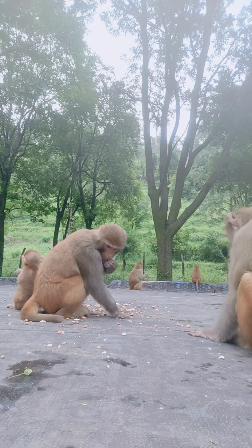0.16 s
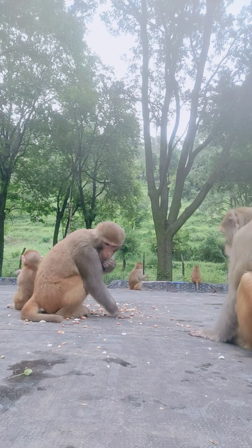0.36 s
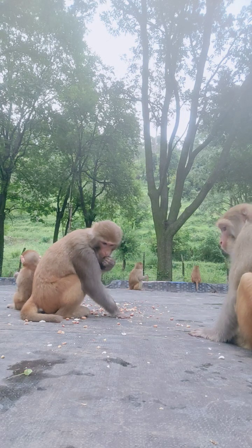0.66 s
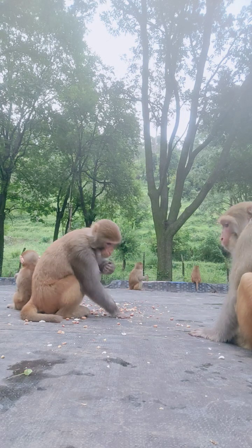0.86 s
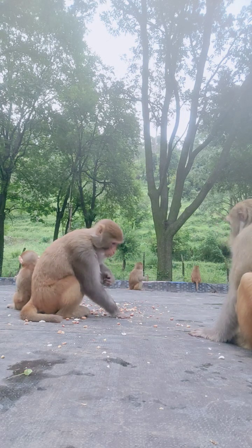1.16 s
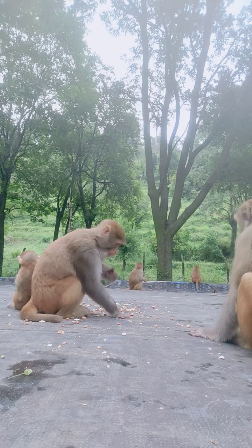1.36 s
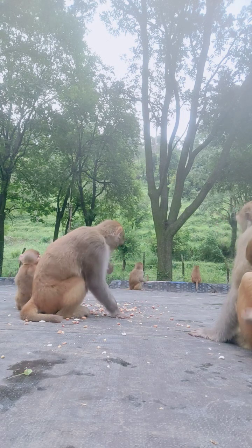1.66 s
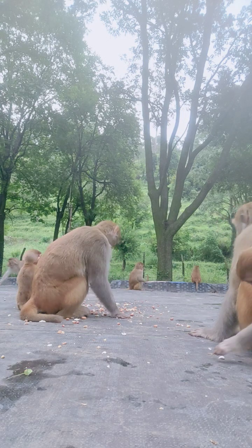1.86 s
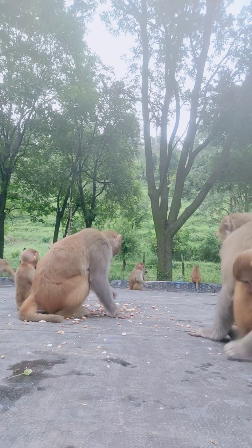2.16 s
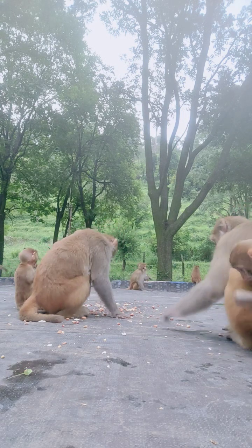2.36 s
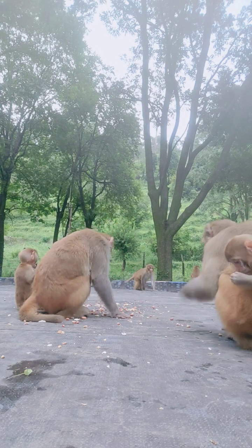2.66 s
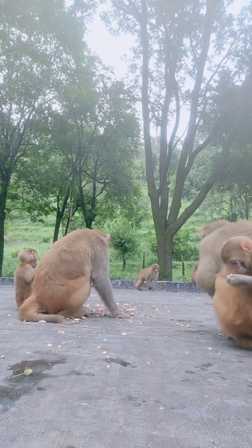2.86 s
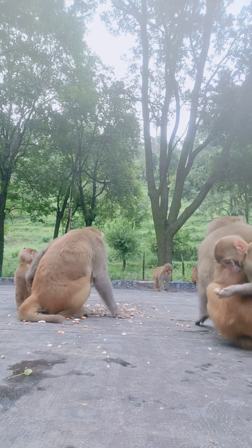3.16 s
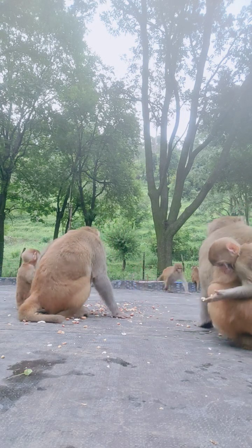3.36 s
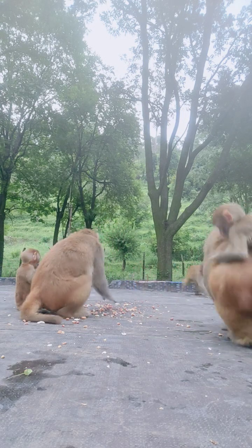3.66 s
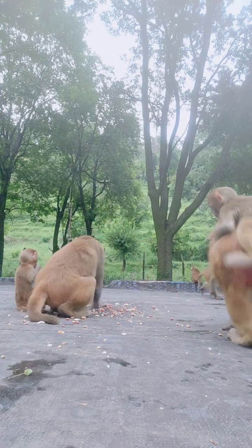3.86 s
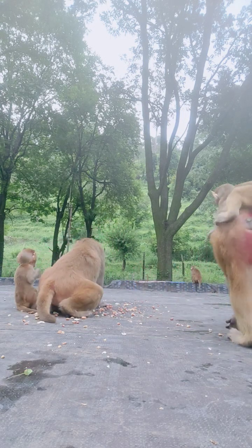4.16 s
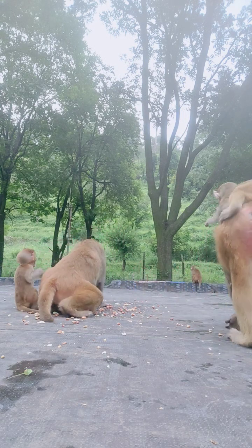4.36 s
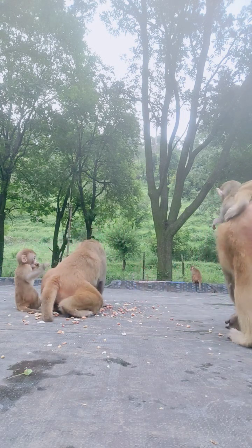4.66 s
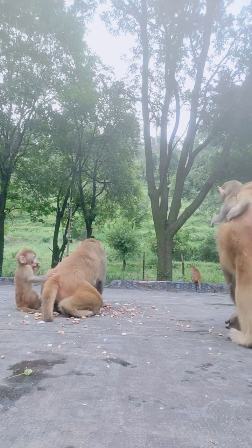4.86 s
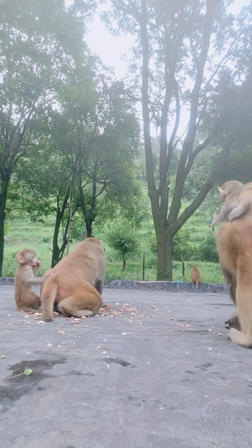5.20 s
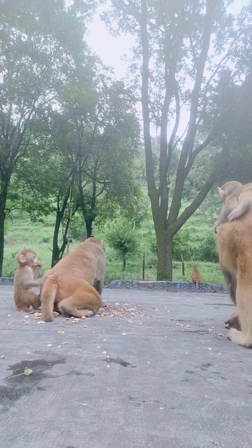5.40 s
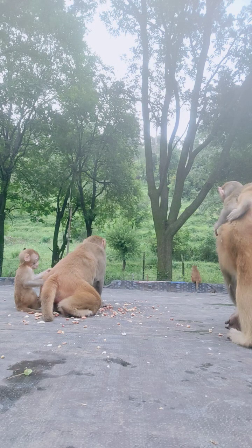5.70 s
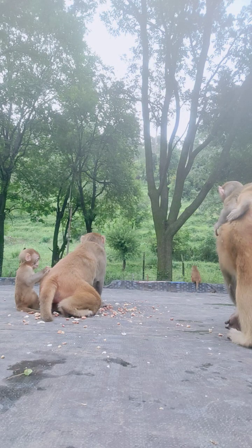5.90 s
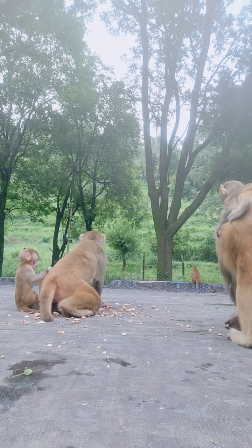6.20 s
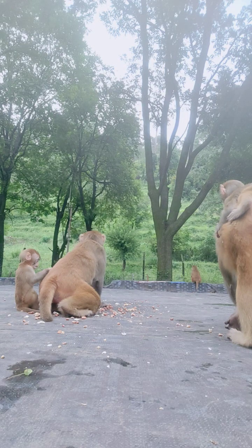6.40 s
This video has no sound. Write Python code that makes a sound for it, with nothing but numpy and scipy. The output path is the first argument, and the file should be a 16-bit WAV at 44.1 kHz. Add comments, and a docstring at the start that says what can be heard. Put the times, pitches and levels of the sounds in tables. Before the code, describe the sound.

A monkey troop forages in an open grove. A nearby caller repeats breathy, fluttering barks in runs, then pauses, ending with a stronger bark that is cut off. Faint husk snaps, dry rustle, a distant thin bird whistle, small coos, pulsed infant squeaks and chopped grunts fill the gaps. Continuous high cicada whine and soft low air surround it; the stereo microphone hears lively outdoor echoes.

```python
"""A paved yard among trees: one macaque gives four bouts of hoarse barks that the grove throws back.
Each bark mixes a fluttering fold tone with breath noise ringing the throat. Others coo in clean overtones,
grunt in chopped breath and squeak in pulsed trills and hiss. A far bird whistles in thin narrow noise.
Husks snap and rustle as tiny noise bursts, cicadas whine as ringing clicks, the air hums as shaped noise."""
import sys
import numpy as np
from scipy import signal
from scipy.fft import rfft, irfft
from scipy.io import wavfile
from scipy.ndimage import uniform_filter1d

SR = 44100
rng = np.random.default_rng(int(sys.argv[2]) if len(sys.argv) > 2 else 0)


def store_wav(level_fs):
    """Save 16-bit WAV to argv[1]."""
    pcm = np.round(np.clip(np.atleast_2d(level_fs), -1, 1) * 32767)
    wavfile.write(sys.argv[1], SR, pcm.T.astype(np.int16))


N = 288414  # length [samples]


def amp(db):
    """Decibels to an amplitude factor."""
    return 10 ** (np.asarray(db) / 20)


def evened(x):
    """Scales a sound to rms 1."""
    return x / np.sqrt(np.mean(abs(x) ** 2) + 1e-20)


def read(points, hz):
    """Reads a (frequency, value) table at hz, straight lines on a log frequency axis."""
    f, value = np.transpose(points)
    return np.interp(np.log(hz + 1), np.log(f + 1), value)


def curves(rows):
    """Turns rows of (time, values...) into one smooth-running curve per value."""
    s, *columns = np.transpose(rows)
    t = np.arange(s[0], s[-1], 1 / SR)
    return [np.interp(t, s, c) for c in columns]


def add(mix, s, sound):
    """Lays a sound into the mix at s seconds, cut at the end of the mix."""
    part = mix[round(s * SR):][:len(sound)]
    part += sound[:len(part)]


def resonate(x, hz, width, order=2):
    """A resonance that can move: shifts the curve hz to zero, smooths, shifts back."""
    turn = np.exp(2j * np.pi * np.cumsum(hz * np.ones(len(x))) / SR)
    r = np.exp(-np.pi * width / SR)
    low = x / turn
    for _ in range(order):
        low = signal.lfilter([1 - r], [1, -r], low)
    return 2 * (turn * low).real


def wobble(n, hz):
    """Slow chance of rms about 1, moving up to about hz."""
    span = max(int(SR / hz / 2), 1)
    once = uniform_filter1d(rng.standard_normal(n + 4000), span)
    return evened(uniform_filter1d(once, span))[2000:n + 2000]


def coloured(x, points):
    """Weights the spectrum of x by a (frequency, level) table."""
    return irfft(rfft(x) * amp(read(points, np.fft.rfftfreq(len(x), 1 / SR))), len(x))


# The caller's barks: (time [s], length [s], effort [dB], top pitch [Hz], mouth resonance [Hz],
# mouth opening [dB], rasp resonance [Hz], rasp [dB]); wobbles and bends play around these
BARKS = [(0.368, 0.18, -24.5, 569, 871, -1.5, 1385, -17), (0.566, 0.22, -24.5, 566, 886.4, -4, 1430, -17.5),
         (0.787, 0.22, -25.5, 532.2, 886, -4.5, 1440, -16.5),
         (1.016, 0.22, -26, 548.4, 918.7, 1.5, 1530, -20.5), (1.227, 0.2, -26, 564.4, 889, 1, 1530, -19),
         (1.45, 0.2, -26.5, 570, 899.7, 1, 1578, -16.5), (2.192, 0.19, -24.5, 556, 943.5, -3, 1510, -18),
         (2.398, 0.2, -24, 563.4, 922.4, -4.5, 1513, -17),
         (2.608, 0.23, -24, 553, 905.4, -6.5, 1527, -16.5),
         (2.817, 0.22, -25, 539.6, 917, -5.5, 1540, -16.5),
         (3.027, 0.2, -23, 545.4, 907, -4.5, 1550, -16.5), (3.224, 0.21, -27.5, 537, 939, -1, 1597, -16),
         (4.044, 0.1953, -25.5, 575.7, 998, -3, 1730, -14),
         (4.307, 0.2, -25.5, 562.2, 973, -4.5, 1730, -13.5),
         (4.531, 0.2, -26, 555.8, 931, -2.5, 1627, -15.5), (4.758, 0.21, -26.5, 553, 970, -2, 1670, -16.5),
         (5.021, 0.19, -27, 582.7, 1027, 0, 1790, -15.5), (6.224, 0.16, -27, 586, 1004, 3, 1670, -18.5),
         (6.493, 0.22, -21.5, 623, 1030, -9.5, 1730, -13)]
# Top of the throat, for a rasp at 1500 Hz: (frequency [Hz], width [Hz], level relative to the rasp [dB])
THROAT_TOP = [(2183, 250, -15), (2602, 100, -18.5)]
# First bark of each bout: (time [s])
BOUT_STARTS = [0.37, 2.195, 4.043, 6.225]
EDGE_PITCH, SAG_HZ = .475, 49.6  # end pitch as a share of mouth resonance; total sag along the bark
SCOOP_HZ, SCOOP_S = 31.5, 0.013  # the voice slides up into the bark
SWELL_DB, TIRING_DB_PER_S = 4.5, -4.5  # early barks of a bout swell, later ones fade
HALF_DB = -28.5  # faint line at half pitch, relative to effort


def bark(s, length, effort_db, top_hz, mouth_hz, mouth_db, rasp_hz, rasp_db):
    """Unsteady folds arch in pitch and flutter; breath noise rings the throat most while the mouth is widest."""
    n = int(length * SR)
    u = np.linspace(0, 1, n)  # progress through the bark
    opening = np.sin(np.pi * u ** .78)
    edge_hz = EDGE_PITCH * mouth_hz
    pitch = edge_hz - SAG_HZ * (u - .5) + (top_hz - edge_hz) * opening
    pitch = pitch - SCOOP_HZ * np.exp(-u * length / SCOOP_S)
    breath = rng.standard_normal(n + 2000)

    # voiced tone of the folds
    jitter = 1 + .03 * wobble(n, 60) + .03 * wobble(n, 15)
    phase = 2 * np.pi * np.cumsum(pitch * jitter) / SR
    unsteady = np.minimum(u / .3, 1)  # the folds start firm
    beating = np.sin(2 * np.pi * np.cumsum(35 + 9 * wobble(n, 20)) / SR)
    flutter = 1.4 - .4 * unsteady + unsteady * (.3 * wobble(n, 60) + .33 * beating)
    low = flutter * np.sin(phase) + .42 * opening * evened(resonate(breath[:n], pitch, 200))

    # breath through mouth and throat, gated by strong-weak fold beats
    puffs = breath[:n] * (1 + .5 * np.cos(phase / 2))
    bend = 0.935 + 0.084 * opening + 0.035 * wobble(n, 18)  # the jaw wavers
    high = evened(resonate(puffs, mouth_hz * bend, 80))
    high = high + amp(-4.5) * evened(resonate(breath[500:n + 500], 0.803 * mouth_hz, 350))
    rasp = evened(resonate(breath[2000:], rasp_hz * bend, 90))
    rasp = rasp + amp(-1.5) * evened(resonate(puffs, .91 * rasp_hz * bend, 200))
    for hz, width, db in THROAT_TOP:
        ring = evened(resonate(puffs, hz * (rasp_hz / 1500) ** 0.48, width))
        rasp = rasp + amp(db + 2.2 * wobble(n, 23)) * ring
    high = (high + amp(rasp_db) * rasp) * (1 + 0.2 * (flutter - 1))  # the flutter chops the breath too

    since_start = min(abs(s - b) for b in BOUT_STARTS if b < s + .05)
    fade_db = SWELL_DB + TIRING_DB_PER_S * since_start
    shape = np.minimum(1, np.minimum(u / 0.063, (1 - u) / 0.18)) * amp(fade_db * (u - .5))
    voice = evened(low) + amp(mouth_db) * high * (0.15 + opening ** 2)
    thin = signal.butter(4, 320, "high", fs=SR, output="sos")
    half = amp(HALF_DB) * flutter * np.sin(phase / 2) * shape
    return amp(effort_db) * (half + signal.sosfilt(thin, voice * shape))


# Clean coos, one table each: (time [s], pitch [Hz], level [dB])
COOS = [
    [(1.25, 838, -50), (1.28, 863, -52), (1.37, 872, -55), (1.41, 844, -58)],
    [(1.76, 561, -43), (1.83, 620, -48), (1.89, 678, -46.5), (1.98, 660, -50.5), (2.05, 578, -40)],
    [(2.06, 620, -46.5), (2.1, 587, -49), (2.15, 604, -50)],
    [(2.27, 649, -55), (2.31, 664, -40.5), (2.36, 590, -45), (2.43, 573, -48), (2.49, 523, -57)],
]
# Mouth colour of each coo: (frequency [Hz], level [dB])
COO_MOUTHS = [
    [(870, -2), (1740, -17), (2600, 4), (3500, -10.5), (4350, -9), (5200, -13), (6100, -28), (7800, -13),
     (8700, -39)],
    [(650, -29), (1300, -6), (1950, -33.5), (2280, -19), (2700, -22.5), (3200, -50)],
    [(600, -0.5), (1200, -36.5), (9000, -75)],
    [(600, -15), (1200, -3), (1900, -7), (2500, -26), (5200, -12.5), (7000, -25), (9000, -26), (11000, -35),
     (14000, -32)],
]
# Time until the lips are open and the high overtones sound, per coo: (time [s])
COO_OPENING = [0.014, .02, .02, 0.1]


def coo(rows, mouth, opening):
    """Steady folds: clean overtones weighted by the mouth; the high ones come as the lips open."""
    hz, db = curves(rows)
    n = len(hz)
    shut_db = -25 * np.clip(1 - np.arange(n) / SR / opening, 0, 1) ** .5
    phase = 2 * np.pi * np.cumsum(hz * (1 + 0.0031 * wobble(n, 40))) / SR
    tone = np.zeros(n)
    for k in range(1, 26):
        lips_db = shut_db * np.minimum(k * hz / 4000, 1) ** 2
        tone += amp(read(mouth, k * hz) + lips_db) * np.sin(k * phase)
    return amp(db) * np.sqrt(2) * tone * signal.windows.tukey(n, .2)


# Rough grunts close by, one table each: (time [s], level [dB])
GRUNTS = [
    [(5.6, -46), (5.645, -42)],
    [(5.638, -34), (5.72, -37.5), (5.79, -65)],
    [(6.45, -36.5), (6.497, -45)],
    [(6.49, -35), (6.54, -31.5)],
]
# Mouth colour of the grunts: (frequency [Hz], level [dB per Hz])
GRUNT_MOUTH = [(90, -30), (200, -0.5), (540, 2), (1200, -7), (2100, -13.5), (3050, -7), (3500, -15.5),
               (4200, -9.5), (4800, -29.5), (12000, -44)]


def grunt(rows):
    """Breath chopped by uneven fold beats, around 325 a second."""
    db, = curves(rows)
    n = len(db)
    beats = np.cumsum(325 + 60 * wobble(n, 80)) / SR
    gate = .05 + np.exp(-(beats % 1) / .15)
    puffs = gate * amp(3.5 * wobble(n, 90)) * rng.standard_normal(n)
    return amp(db) * evened(coloured(puffs, GRUNT_MOUTH)) * signal.windows.tukey(n, 500 / n)


# Infant squeaks, levels before placing left:
# (time [s], trill level [dB], trill pitch [Hz], trill length [s], breath hiss level [dB])
SQUEAKS = [(3.251, -47, 3170, 0.015, -65.5), (3.464, -39.5, 3490, 0.05, -52),
           (3.684, -41.5, 3510, 0.022, -57), (3.88, -45.5, 3540, 0.027, -57),
           (5.009, -51, 3070, 0.039, -61.5), (5.222, -40, 3020, 0.019, -53),
           (5.436, -44, 3340, 0.021, -55.5), (5.951, -50, 3580, 0.024, -54)]
# Hiss colour, slid along so that its third row lands on the trill: (frequency [Hz], level [dB per Hz])
HISS = [(1500, -12.5), (3300, -3.5), (3620, 3.5), (3950, -1), (8300, -16), (9800, -13), (12500, -11.5),
        (15500, -14.5)]


def squeak(trill_db, trill_hz, length, hiss_db):
    """A falling trill of short pulses and a crackly puff of hiss that rings at the same pitch and dies away."""
    t = np.arange(SR // 4) / SR
    n = len(t)
    colour = [(f * trill_hz / HISS[2][0], db) for f, db in HISS]
    hiss = evened(coloured(rng.standard_normal(n), colour))
    hiss = hiss * amp(2.5 * wobble(n, 25) + 2 * wobble(n, 500))  # grainy, in clumps
    ring = evened(resonate(rng.standard_normal(n), trill_hz * (1 + 0.012 * wobble(n, 11)), 380))
    ring = ring * amp(3.5 * wobble(n, 60)) * np.clip(t / .03 - .5, 0, 1) * np.exp(-(t / .2) ** 4)
    hiss = hiss * np.minimum(t / 0.007, 1) * np.exp(-(t / 0.13) ** 2) + amp(-8.5) * ring

    u = np.clip((t - .018) / length, 0, 1)  # progress through the trill
    beats = np.cumsum(270 * (1 + 0.13 * wobble(n, 110))) / SR
    gate = np.cos(np.pi * beats) ** 4
    shape = np.sin(np.pi * u) ** 3.9
    glide = trill_hz * (1.04 - 0.14 * u) * (1 + 0.057 * wobble(n, 300))
    trill = np.sin(2 * np.pi * np.cumsum(glide) / SR) * gate * shape

    # a quick upward flick opens the squeak
    phase = 2 * np.pi * np.cumsum(trill_hz * (0.85 + 22 * t)) / SR
    flick = (np.sin(phase) + 0.53 * np.sin(3 * phase)) * np.sin(np.pi * np.minimum(t / 0.006, 1))
    return amp(trill_db) * 2 * trill + amp(hiss_db) * (hiss + amp(-8.5) * flick)


# Echo decay of the grove by band: (frequency [Hz], time to fall 60 dB [s])
GROVE = [(300, 0.95), (800, 0.91), (2000, 0.78), (4000, 0.75), (12000, 0.042)]
# Left-right likeness of echoes and air: (frequency [Hz], likeness [0 to 1])
SAME = [(60, 0.95), (400, 0.99), (800, 0.97), (1250, 0.17), (3000, 0.053)]


def grove(x):
    """Sparse echoes from trunks and paving, each band dying at its own speed; treble scatters more, both sides."""
    taps = np.zeros((3, SR))  # one shared set, then one for each ear
    at = np.arange(300, SR - 20, 20) + rng.integers(0, 20, (3, (SR - 301) // 20))
    np.put_along_axis(taps, at, rng.choice([-1., 1.], at.shape), 1)
    hz, t, z = signal.stft(taps, SR, nperseg=256)
    same = np.clip(read(SAME, hz), 0, 1)[:, None]
    z = same * z[0] + np.sqrt(1 - same ** 2) * z[1:]
    decay_db = -60 * t / read(GROVE, hz)[:, None]
    tail = signal.istft(z * amp(decay_db + 7.4 * (1 - same)), SR, nperseg=256)[1]
    tail = tail / np.linalg.norm(tail[0])
    return signal.fftconvolve(x[None], tail, axes=1)[:, :len(x)]


# Far bird, levels before placing left: (start [s], end [s], start pitch [Hz], level [dB])
WHISTLES = [(1.035, 1.225, 3610, -69), (1.699, 2.143, 4340, -75), (2.604, 2.903, 4360, -71.5),
            (2.836, 2.987, 3540, -64.5), (4.63, 4.796, 3585, -66), (4.864, 5.33, 4360, -69.5),
            (5.718, 5.95, 4360, -73), (6.345, 6.45, 3580, -63)]


def whistle(length, hz, db):
    """A thin tone of narrow noise that glides up a little, blurred by distance."""
    n = int(length * SR)
    glide = hz * (1 + 0.034 * np.sin(1.9 * np.linspace(0, 1, n)))
    tone = evened(resonate(rng.standard_normal(n), glide, 55))
    return amp(db) * tone * signal.windows.tukey(n, .5)


# Dry husks snapping, levels before placing left: (time [s], level [dB])
TICKS = [(1.4007, -45), (1.785, -52), (2.343, -53), (2.824, -48)]


def tick(db):
    """A snap of bright noise that dies within about a millisecond."""
    t = np.arange(130) / SR
    return amp(db) * np.diff(rng.standard_normal(131)) * np.exp(-t / .0006)


CICADA_DB = -55  # level before the throb


def cicadas():
    """Many tymbals clicking out of step ring two broad neighbouring resonances, differently at each ear."""
    clicks = rng.standard_normal((2, N)) * (rng.random((2, N)) < .3)
    choir = [resonate(c, 6516, 770) + amp(-5.5) * resonate(c[::-1], 7190, 580) for c in clicks]
    throb = amp([.8 * wobble(N, 40) for _ in clicks])
    return amp(CICADA_DB) * evened(np.array(choir)) * throb


RUSTLE_DB, RUSTLE_PER_S = -69.5, 200  # level; crackle rate before clumping


def rustle():
    """Tiny dry crackles of husks and fur, in clumps, different at each ear."""
    chance = RUSTLE_PER_S * amp(5 * wobble(N, 3.2)) / SR
    sizes = amp(5.3 * np.minimum(rng.exponential(1, (2, N)), 5))
    sizes = sizes * (rng.random((2, N)) < chance)
    snap = rng.standard_normal(120) * np.exp(-np.arange(120) / 30)
    crackle = [resonate(signal.oaconvolve(side, snap)[:N], 19000, 5000) for side in sizes]
    return amp(RUSTLE_DB) * evened(np.array(crackle))


# Colour of the humming air: (frequency [Hz], level [dB per Hz])
AIR = [(25, -64.5), (65, -18), (110, -7), (250, -4), (600, -7), (1100, -13.5), (2400, -20.5), (4500, -24),
       (5300, -18), (8600, -36.5), (13000, -28.5), (15500, -33)]
AIR_DB = -53.5


def air():
    """Random short-time spectra with drifting patches; bass alike in both ears."""
    frames, hz = N // 256 + 5, np.fft.rfftfreq(1024, 1 / SR)
    a, b, c, d, patches = rng.standard_normal((frames, 513, 5)).T
    patches = evened(uniform_filter1d(uniform_filter1d(patches, 12, 0), 14, 1))
    same = np.clip(read(SAME, hz), -1, 1)[:, None]
    left = a + 1j * b
    right = same * left + np.sqrt(1 - same ** 2) * (c + 1j * d)
    z = np.array([left, right]) * amp(read(AIR, hz)[:, None] + 1.5 * patches)
    return amp(AIR_DB) * evened(signal.istft(z, nperseg=1024, noverlap=768)[1][:, :N])


def scene():
    """Places every voice, sends it into the grove and lays the background under it."""
    lead = SR // 4  # a bark that has just ended still rings in the grove
    caller = np.zeros(N + lead)
    troop, near, cooing = np.zeros((3, N))
    add(caller, .08, bark(*BARKS[5]))
    for s, *row in BARKS:
        add(caller, s + lead / SR, bark(s, *row))
    for rows, mouth, opening in zip(COOS, COO_MOUTHS, COO_OPENING):
        add(cooing, rows[0][0], coo(rows, mouth, opening))
    for rows in GRUNTS:
        add(near, rows[0][0], grunt(rows))
    for s, *row in SQUEAKS:
        add(troop, s, squeak(*row))
    for s, end, *row in WHISTLES:
        add(troop, s, whistle(end - s, *row))
    for s, db in TICKS:
        add(troop, s, tick(db))
    direct = np.array([caller[lead:], caller[lead - 3:-3]])  # the right port is a little farther
    barks = amp(-1.5) * direct + amp(-8) * grove(caller)[:, lead:]
    left_side = troop * amp([[5.], [-7.]])
    close = amp(-13) * cooing  # close callers stir little echo
    echoes = amp(-9.5) * grove(near + troop + close)
    return barks + near + cooing + echoes + left_side + cicadas() + rustle() + air()


# Balance of the two ports: (frequency [Hz], left over right [dB])
LEAN = [(100, 1.5), (2000, -0.15), (6000, 1), (13000, 2)]
EDGE_HZ = 15540  # upper band limit


def record(dry):
    """The left port hears more treble, deep bass is cut; then the band limit."""
    lean = read(LEAN, np.fft.rfftfreq(N, 1 / SR)) / 2
    ports = irfft(rfft(dry) * amp([lean, -lean]), N)
    ports = signal.sosfilt(signal.butter(2, 55, "high", fs=SR, output="sos"), ports)
    limit = signal.firwin(2047, EDGE_HZ, window=("kaiser", 12), fs=SR)
    return signal.oaconvolve(ports, limit[None], "same")


dry = scene()
out = record(dry)
store_wav(out)
```